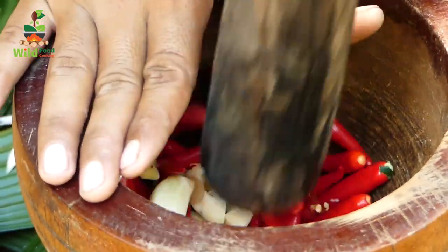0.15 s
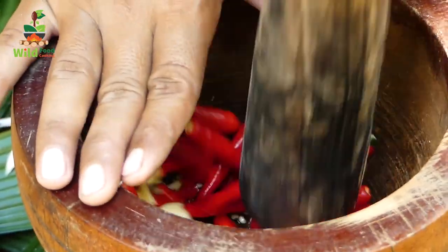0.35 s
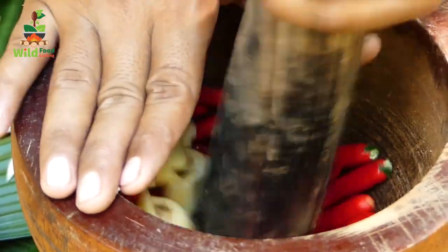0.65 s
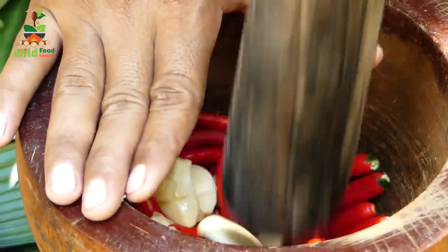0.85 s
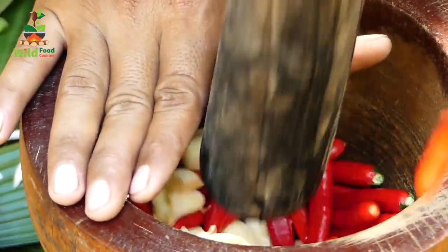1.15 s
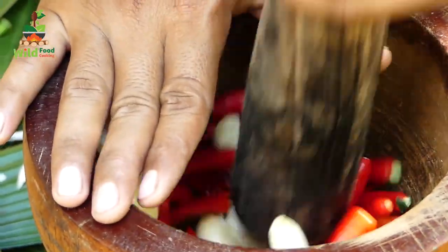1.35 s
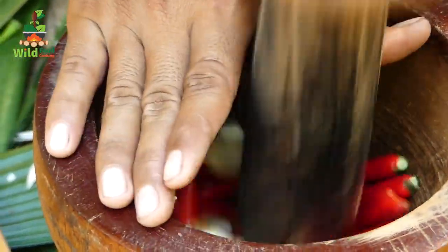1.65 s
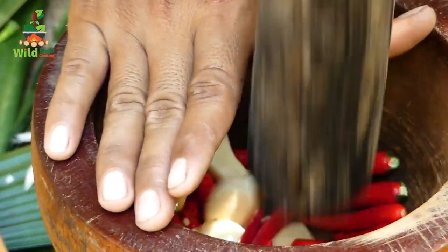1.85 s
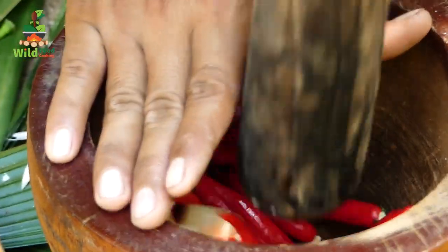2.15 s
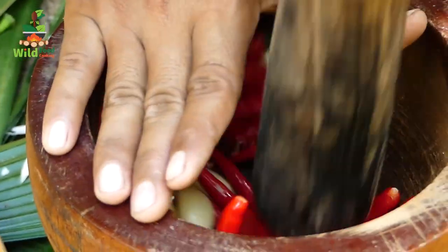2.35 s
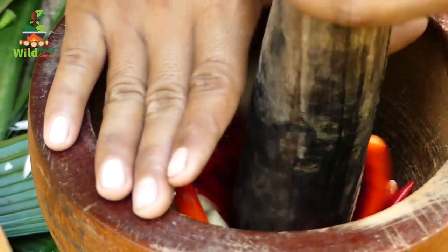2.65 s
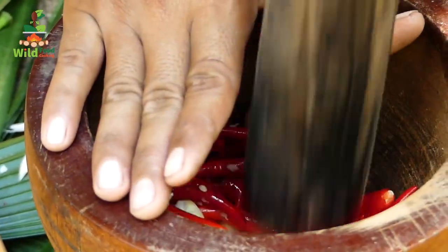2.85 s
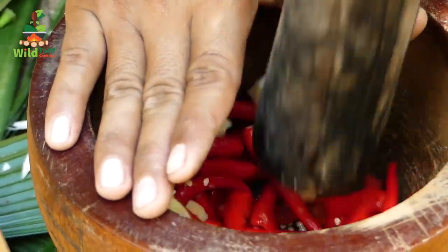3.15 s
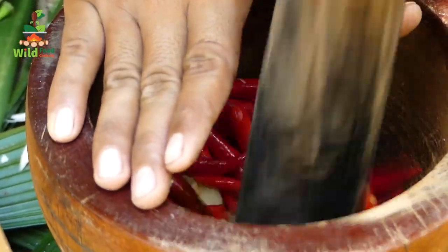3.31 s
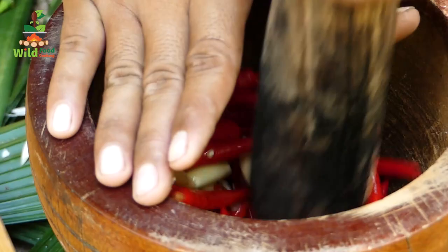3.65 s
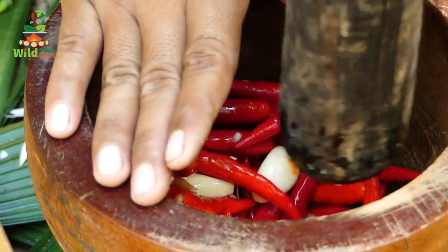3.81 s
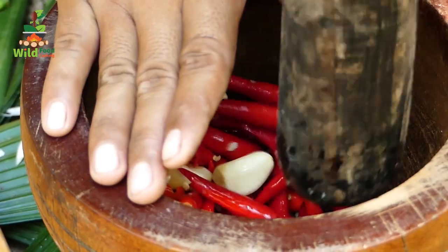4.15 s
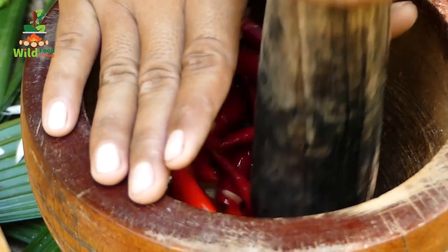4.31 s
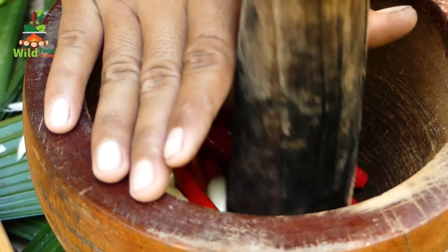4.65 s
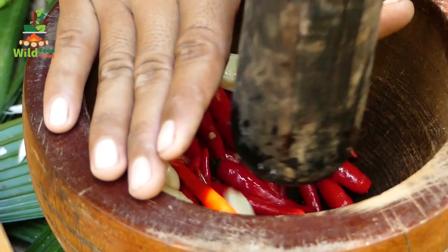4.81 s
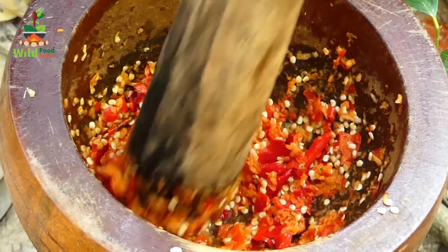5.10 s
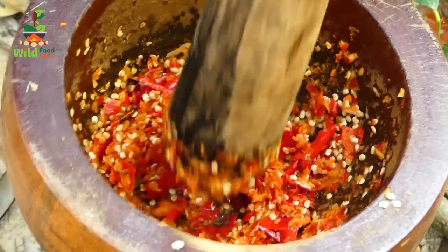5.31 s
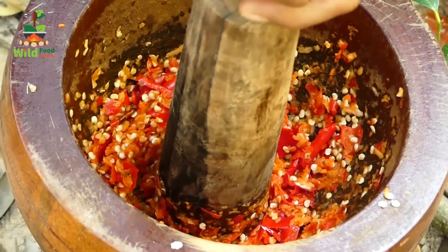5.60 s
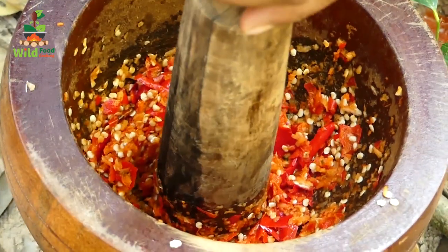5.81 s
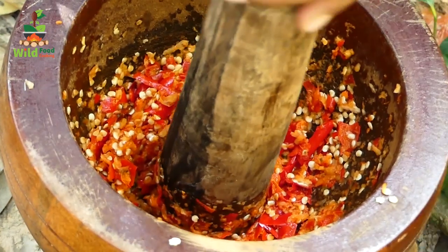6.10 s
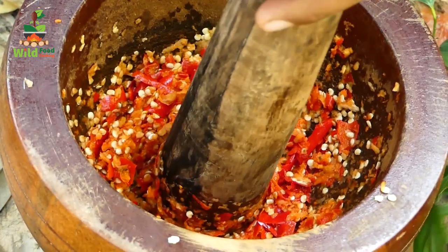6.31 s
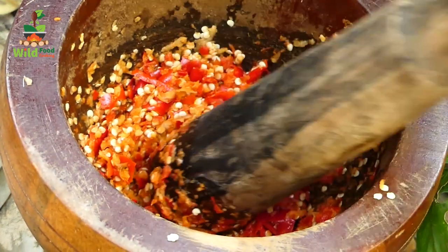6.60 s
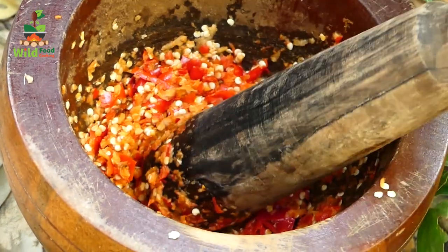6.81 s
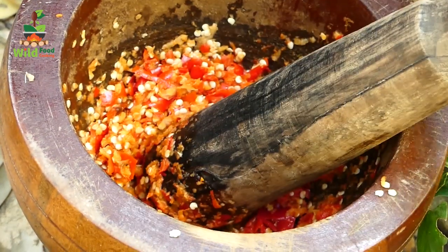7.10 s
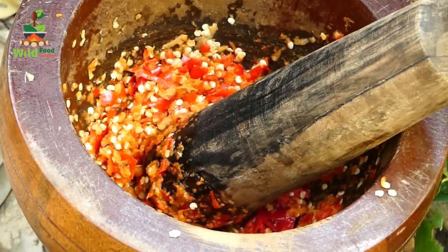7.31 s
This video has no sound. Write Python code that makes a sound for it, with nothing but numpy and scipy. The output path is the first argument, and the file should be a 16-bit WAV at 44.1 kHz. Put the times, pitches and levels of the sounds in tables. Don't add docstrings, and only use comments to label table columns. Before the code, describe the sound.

Close microphone, nearly mono, in open air: about nine pounding blows a second, high-pitched, crisp and wet, each varying in crunch, thud and ring. Then a soft touch and a few natural-speed strikes with light wind and faint insects. Everything cuts out briefly; a hard wooden strike follows, then scraping through paste with seeds popping and short, rising bird whistles.

```python
import sys
import numpy as np
from scipy import signal
from scipy.io import wavfile
from scipy.ndimage import uniform_filter1d

SR = 44100
rng = np.random.default_rng(int(sys.argv[2]) if len(sys.argv) > 2 else 0)


def transcribe(u):
    v = np.clip(np.atleast_2d(u).T, -1, 1)
    q = np.round(v * 32767).astype(np.int16)
    wavfile.write(sys.argv[1], SR, q)


def volts_from_decibels(level):
    exponent = np.asarray(level, float) / 20
    return 10 ** exponent


N = 328969
SLOW_FROM_S, FAST = 3.631, 3
GRIND_FROM_S = 5.7

# start in seconds, end in seconds.
SILENCE = (5.0915, 5.4085)

# time in seconds, crunch level in dB, thud level in dB, ring
# level in dB, time the food takes to give way in ms.
EVEN_BLOWS = [(0.0654, -26.5, -31.5, -62, 3), (0.1746, -25, -26, -58, 6), (0.2849, -31.5, -31, -30, 3),
              (0.3958, -29.5, -36.5, -25, 2.4), (0.5111, -30.5, -25.5, -50, 8.5),
              (0.6191, -26.5, -29, -32, 6.5), (0.7285, -32, -28.5, -27.5, 3), (0.8396, -26, -22, -29, 3.5),
              (0.9526, -30, -45, -23, 5), (1.0630, -19, -26.5, -36, 7), (1.1744, -22.5, -28.5, -39, 4.5),
              (1.2847, -24.5, -18, -25, 7), (1.4093, -29.5, -30.5, -28.5, 8.5), (1.521, -29, -42, -35, 7),
              (1.6288, -32, -37.5, -42, 5.3), (1.7352, -33, -31.5, -33, 3.5),
              (1.8485, -26.5, -38.5, -29, 6.5), (1.9567, -27.5, -44, -34, 3.5),
              (2.0655, -31.5, -31, -33, 2), (2.176, -31, -26.5, -58, 2), (2.286, -31.5, -41, -47, 3),
              (2.3965, -29, -35, -30.5, 1.5), (2.5068, -30.5, -25, -25, 2),
              (2.6171, -31.5, -46, -33.5, 3.5), (2.7246, -32.5, -42, -34.5, 8),
              (2.8375, -27, -32.5, -49, 7), (2.9485, -32, -23, -33, 2.5), (3.0601, -32, -36.5, -32.5, 7.5),
              (3.1748, -38, -36.5, -31.5, 5.5), (3.296, -34.5, -45, -38, 4), (3.404, -33.5, -40.5, -40, 4),
              (3.516, -27, -29, -36, 3)]
# time in seconds, crunch level in dB, thud level in dB,
# ring level in dB, time the food takes to give way in ms.
STRIKES = [
    (3.645, -43.5, -62, -64, 14),
    (3.951, -34, -31.5, -40, 1),
    (4.293, -24.5, -33, -8.5, 8.5),
    (4.6253, -27, -37, -62, 4),
    (4.951, -25.5, -32, -43, 5.5),
    (5.4899, -11, -31, -2.5, 2.8),
]
HITS = EVEN_BLOWS + STRIKES
# time in seconds, level in dB, 15 dB
# rise in ms, 15 dB fall in ms.
BURSTS = [(2.295, -35, 1.5, 3), (1.098, -46, 3, 4), (1.36, -46, 8, 8), (2.157, -45, 1, 2),
          (2.519, -40, 2, 3), (0.9915, -27, .9, .9), (3.2752, -31, .8, .8), (3.976, -39, 17, 14),
          (4.272, -49, 4, 2), (4.283, -35, 4.5, 9), (4.615, -44.5, 7, 15), (4.663, -55.5, 30, 31),
          (4.988, -54.5, 50, 26), (4.941, -41.5, 6.5, 16), (4.326, -51.5, 7.5, 2), (4.342, -47.5, 4, 14),
          (7.42, -44.5, 18, 38), (4.311, -37.5, 19, 15), (5.49, -6, 1.5, 0.5), (5.853, -47, 17, 39),
          (6.179, -26.5, 7, 11.5), (6.691, -34, 2, 16), (6.861, -50.5, 8, 5), (7.182, -51, 41, 42)]
# frequency in Hz, density in dB per Hz.
CRUNCH_FAST = [(350, -31), (600, -1), (1420, -30.5), (1750, 1.5), (3300, -10), (4120, -3), (4610, -5),
               (8720, -4.5), (14400, -7.5), (16500, -38)]
# frequency in Hz, density in dB per Hz.
CRUNCH_SLOW = [(350, -38), (600, 3), (966, -8.5), (1230, -0.5), (1660, -6), (2680, -6.5), (4260, -7.5),
               (4680, -13), (7430, -8.5), (15500, -20.5)]
# frequency in Hz, density in dB per Hz.
CRACK = [(940, -31), (1600, -10.5), (2630, -3), (3580, -10), (4270, -5.5), (6110, -24), (7280, -6),
         (9370, -22), (15400, -16.5), (16300, -28.5)]

# frequency in Hz, level in dB, 60 dB decay in seconds.
THUD = [(140, -7, .045), (225, 0, .045), (290, 3, .04)]
# frequency in Hz, level in dB, 60 dB decay in seconds.
FULL_RING = [(576, 0, .038), (775, -14, .1), (1040, -8, .02), (1365, -11, .055), (1395, -11, .055),
             (1857, -22, .04), (2450, -22, .02)]
# frequency in Hz, level in dB, 60 dB decay in seconds.
BARE_RING = [(590, -2, .028), (690, 0, .026), (1050, -2, .016), (1357, -11, .028), (2450, -5, .007),
             (4070, -10, .004), (5300, -4, .004), (7500, -10, .003)]
# time in seconds, peak level in dB.
TAPS = [(6.123, -25.5), (6.177, -26), (6.193, -24), (6.64, -28), (6.689, -20), (7.131, -35), (7.155, -34),
        (7.379, -28.5)]

# time in seconds, peak level in dB, centre frequency in Hz.
SNAPS = [(0.2204, -36.5, 7640), (0.9253, -43, 12000), (1.1268, -42, 2510), (1.3064, -35, 4460),
         (1.3603, -40, 4680), (1.3833, -37, 5560), (1.5374, -32, 5320), (1.5544, -39, 5700),
         (1.7944, -39.5, 2530), (1.8287, -36, 7870), (2.0358, -38.5, 4300), (2.0804, -33, 9190),
         (2.1186, -39, 11400), (2.6743, -42, 4430), (3.6794, -44, 2660), (3.7968, -46, 6170),
         (4.4897, -45, 4100), (4.794, -38.5, 8100), (4.8798, -46, 7350), (5.9444, -37, 1500),
         (5.9643, -45, 1320), (6.0861, -36, 7950), (6.1044, -39, 9100), (6.4512, -22, 7900),
         (6.9287, -46, 8510), (7.3392, -35, 8170), (7.3602, -22, 7960), (7.4106, -32, 12200),
         (7.4164, -30, 9910), (7.425, -24, 7240)]

HUSH_DB = (-57, -56.5, -53.5)
# frequency in Hz, density in dB per Hz.
HUSH_FAST = [(47, -36), (80, 3.5), (139, 4.5), (428, -2), (533, -8), (1410, -12.5), (1720, -17),
             (2920, -18), (5780, -21), (6450, -21.5), (11500, -24.5), (15600, -28)]
# frequency in Hz, density in dB per Hz.
HUSH_SLOW = [(24, -29), (40, -2), (66, -8.5), (108, -11), (241, -23), (387, -22), (484, -27.5), (591, -25),
             (1080, -30), (1280, -29.5), (4460, -37.5), (15500, -37)]
# frequency in Hz, density in dB per Hz.
HUSH_LATE = [(24, -32), (40, -3.5), (64, -18), (96, -16.5), (229, -21.5), (325, -19.5), (522, -27.5),
             (1410, -28.5), (3220, -36), (5440, -36), (15500, -44)]
# time in seconds, level in dB.
WIND = [(0, -45), (1.4, -45), (2.4, -48), (3.62, -48), (3.64, -46), (4.4, -37), (5.1, -43), (5.4, -38),
        (6.0, -35), (6.7, -34), (7.0, -40), (7.46, -36)]

# start in seconds, end in seconds, centre in Hz, bandwidth in Hz, level in dB.
INSECTS = [(3.66, 3.84, 6150, 200, -77), (4.547, 4.784, 8700, 900, -69), (4.8, 4.97, 6600, 1300, -65),
           (5.49, 5.64, 5300, 500, -65)]
# start in seconds, end in seconds, frequency in Hz, level in dB.
FAR_WHISTLE = (4.092, 4.275, 5762, -59.5)
# time in seconds, direct level in dB, echo level in dB.
CHIRPS = [
    (5.33, -85.5, -57.5),
    (5.884, -40, -47),
    (6.36, -44, -46.5),
    (6.891, -43, -45),
    (7.352, -36, -40),
]

# peak in seconds, peak level in dB, rise in dB per second,
# fall in dB per second.
STROKES = [
    (5.86, -59, 85, 55),
    (6.12, -48, 103, 78),
    (6.184, -44.5, 157, 263),
    (6.631, -39.5, 215, 174),
]
# frequency in Hz, density in dB per Hz.
GRIND_COLOUR = [(88, -36), (150, -4.5), (263, -2.5), (411, -2.5), (519, -5.5), (631, -4), (695, -2.5),
                (1220, -4), (2180, -7.5), (4140, -8.5), (6110, -12), (8170, -8), (15500, -18.5)]

# frequency in Hz, level in dB.
SIDE_DB = [(60, -42), (180, -23.5), (550, -15.5), (1650, -19.5), (4970, -15), (15000, -10.5)]


def evened(x):
    return x / np.sqrt(np.mean(x ** 2) + 1e-20)


def read(points, hz):
    f, value = np.transpose(points)
    return np.interp(np.log(hz + 1), np.log(f + 1), value)


def follow(rows):
    s, value = np.transpose(rows)
    return np.interp(np.arange(N) / SR, s, value)


def add(mix, s, sound):
    part = mix[round(s * SR):][:len(sound)]
    part += sound[:len(part)]


def speed(s):
    return np.where(s < SLOW_FROM_S, FAST, 1)


def colour(x, spectrum):
    log_gain = np.log(volts_from_decibels(read(spectrum, abs(np.fft.fftfreq(4096, 1 / SR)))))
    response = np.exp(np.conj(signal.hilbert(log_gain)))
    taps = np.fft.ifft(response).real[:2048]
    return signal.oaconvolve(x, taps / np.linalg.norm(taps))[:len(x)]


def band(x, hz, width):
    return signal.lfilter(*signal.iirpeak(hz, hz / width, SR), x)


def drift(samples):
    once = uniform_filter1d(rng.standard_normal(N), int(samples))
    return evened(uniform_filter1d(once, int(samples)))


def crackle(spread_db, grain):
    return evened(rng.standard_normal(N) * volts_from_decibels(spread_db * drift(grain)))


def modes(table, factor, detune, contact_ms, low_hz):
    t = np.arange(6000) / SR * factor
    ring = np.zeros(len(t))
    for (hz, db, t60), shift in zip(table, detune):
        ring += volts_from_decibels(db - 60 * t / t60) * np.sin(2 * np.pi * hz * shift * t)
    ring = np.convolve(ring, np.hanning(3 + int(contact_ms * SR / 1000 / factor)))
    ring = signal.sosfilt(signal.butter(2, low_hz * factor, "high", fs=SR, output="sos"), ring)
    return ring / abs(ring).max() * np.sqrt(2)


def give_ms(s, db, rise_ms):
    hard_db, hard_fall_ms, soft_ms_per_db, shorter_per_ms = -22, 5, .6, .55
    stretch = 1 if speed(s) > 1 else 2.2
    fall_ms = hard_fall_ms + soft_ms_per_db * (hard_db - db) - shorter_per_ms * rise_ms / stretch
    return rise_ms, stretch * max(fall_ms, 1.0)


def crushing():
    t, level, cracks = np.arange(N) / SR, np.zeros(N), np.zeros(N)
    blows = [(s, db, *give_ms(s, db, ms)) for s, db, *_, ms in HITS]
    chance = rng.uniform(-1.6, 1, (len(HITS), 2))
    lifts = [(row[0] + 0.049 + 0.017 * a, -57 + 5 * b, 14, 18)
             for row, (a, b) in zip(HITS, chance) if speed(row[0]) > 1]
    for s, db, rise_ms, fall_ms in blows + BURSTS + lifts:
        near = slice(max(round((s - .06) * SR), 0), round((s + .25) * SR))
        ms = (t[near] - s) * 1000
        drop = np.where(ms < 0, abs(ms / rise_ms) ** 2.3, abs(ms / fall_ms) ** 1.2)
        burst = volts_from_decibels(db - 15 * drop)
        settle = volts_from_decibels(min(db, -17) - 31.5 - .5 * ms * speed(s)) * (ms > 0)
        level[near] = np.hypot(level[near], np.hypot(burst, settle))
        cracks[round(s * SR)] = -volts_from_decibels(db + 19 - .6 * (rise_ms + fall_ms))
    drive = crackle(spread_db=2.5, grain=12) * level + cracks
    fast, bare = speed(t - .06) > 1, abs(t - HITS[-1][0]) < .2
    coloured = [colour(drive, spectrum) for spectrum in (CRUNCH_FAST, CRACK, CRUNCH_SLOW)]
    return volts_from_decibels(-1.5) * np.select([fast, bare, t > 0], coloured)


def wood():
    out, rolling = np.zeros(N), np.full(N, volts_from_decibels(-56.5))
    chance = rng.uniform(-0.55, 1, (len(HITS) + len(TAPS), 12))
    for (s, _, thud_db, ring_db, *_), c in zip(HITS, chance):
        factor = speed(s)
        thud = modes(THUD, factor, 1 + .12 * c, contact_ms=2.6, low_hz=100)
        add(out, s + .001, volts_from_decibels(thud_db) * thud)
        ring, early = (FULL_RING, 0.002353 / factor) if s < SILENCE[0] else (BARE_RING, .0004)
        detune = 1 + 0.026 * (factor - 1) * c[4:]
        add(out, s - early, volts_from_decibels(ring_db) * modes(ring, factor, detune, contact_ms=.2, low_hz=300))
        add(rolling, s - early, volts_from_decibels(0.37 * ring_db - 28 - 80 * factor * np.arange(8000) / SR))
    for (s, db), c in zip(TAPS, chance[len(HITS):]):
        add(out, s, volts_from_decibels(db - 9) * modes(BARE_RING, 0.836, 1 + 0.1 * c, contact_ms=0.22, low_hz=300))
    rub = rng.standard_normal(N) * rolling * volts_from_decibels(3.5 * drift(250))
    hum_modes = ((582, 0), (1375, -8), (2450, -19))  # Hz, dB
    hums = [sum(volts_from_decibels(db) * band(rub, hz * k, 40 * k) for hz, db in hum_modes) for k in (FAST, 1)]
    return out + np.where(speed(np.arange(N) / SR) > 1, *hums)


def snaps():
    out, t = np.zeros(N), np.arange(120) / SR
    when, size, pitch = rng.random((3, 24))
    low_hz, high_hz = 3000, 9000
    faint_db = -55 + 8 * (2 * size - 1)
    faint_hz = low_hz * (high_hz / low_hz) ** pitch
    every = SNAPS + list(zip(when * SLOW_FROM_S, faint_db, faint_hz))
    for (s, db, hz), noise in zip(every, rng.standard_normal((len(every), 120))):
        click = band(noise * np.exp(-t / 0.00029), hz, .5 * hz)
        add(out, s, volts_from_decibels(db + 0.5) * click / abs(click).max())
    return out


def air():
    t = np.arange(N) / SR
    fast = speed(t) > 1
    rustle = crackle(spread_db=1.0, grain=30) * volts_from_decibels(1.0 * drift(500))
    spectra = (HUSH_FAST, HUSH_SLOW, HUSH_LATE)
    hushes = [volts_from_decibels(db) * colour(rustle, spectrum) for db, spectrum in zip(HUSH_DB, spectra)]
    hush = np.select([fast, t < SILENCE[0], t > 0], hushes)
    noise, gusts = rng.standard_normal(N), []
    for k in (FAST, 1):
        low = signal.butter(3, 17 * k, fs=SR, output="sos")
        gusts.append(evened(signal.sosfilt(low, band(noise, 13 * k, 14 * k))))
    return hush + np.where(fast, *gusts) * volts_from_decibels(follow(WIND))


def insects():
    out = np.zeros(N)
    for start, end, hz, width, db in INSECTS:
        noise = rng.standard_normal(round((end - start) * SR))
        buzz = band(band(noise, hz, width), hz, width)
        add(out, start, volts_from_decibels(db) * evened(buzz) * signal.windows.tukey(len(buzz), .3))
    return out


def bird():
    out = np.zeros(N)
    t = np.arange(round(0.028 * SR)) / SR
    glide_hz = 5770 - 540 * np.exp(-t / .005)
    whistle = np.sin(2 * np.pi * np.cumsum(glide_hz) / SR) * np.hanning(len(t))
    late = np.arange(round(.4 * SR)) / SR
    for (s, direct_db, echo_db), noise in zip(CHIRPS, rng.standard_normal((len(CHIRPS), len(late)))):
        echoes = band(np.convolve(whistle, noise * volts_from_decibels(-60 * late / .6)), 5680, 177)
        add(out, s, volts_from_decibels(direct_db + 8.5) * whistle)
        add(out, s + 0.0084, volts_from_decibels(echo_db + 3) * echoes / np.linalg.norm(whistle))
    start, end, hz, db = FAR_WHISTLE
    t = np.arange(start, end, 1 / SR)
    flutter = 1 + .45 * evened(band(rng.standard_normal(len(t)), 60, 90))
    fade = volts_from_decibels(db - 20 * (t - start)) * signal.windows.tukey(len(t), .2)
    add(out, start, flutter * fade * np.sin(2 * np.pi * hz * t))
    return out


def pressure():
    t = np.arange(N) / SR
    strokes = sum(volts_from_decibels(db - np.where(t < s, rise, fall) * abs(t - s)) for s, db, rise, fall in STROKES)
    rest = volts_from_decibels(-71.5)
    return (strokes + rest) * (t > GRIND_FROM_S)


def grinding():
    out, jerks = np.zeros(N), volts_from_decibels(1.2 * drift(150))
    layers = ((900, "low", 60), ([900, 2500], "band", 40), ([2500, 6000], "band", 24), (6000, "high", 14))
    for hz, kind, grain in layers:
        grit = crackle(spread_db=3.4, grain=grain) * volts_from_decibels(2.0 * drift(300)) * jerks
        out += signal.sosfilt(signal.butter(2, hz, kind, fs=SR, output="sos"), grit)
    return colour(out * pressure() * volts_from_decibels(4), GRIND_COLOUR)


def scene():
    t, crush = np.arange(N) / SR, crushing()
    fast = speed(t) > 1
    mix = crush * ~fast + wood() + snaps() + air() + insects() + bird() + grinding()
    mix = signal.sosfilt(signal.ellip(10, .5, 70, 15900, fs=SR, output="sos"), mix) + crush * fast
    heard = (t < SILENCE[0]) | (t > SILENCE[1])
    return np.tile(mix * heard, (2, 1))


def band_limit(x):
    return signal.sosfilt(signal.butter(12, 16830, fs=SR, output="sos"), x)


def record(dry):
    hz, _, z = signal.stft(dry[0], SR, nperseg=256)
    size = np.minimum(abs(z), volts_from_decibels(-65)) * volts_from_decibels(read(SIDE_DB, hz))[:, None]
    scrambled = size * np.exp(2j * np.pi * rng.random(z.shape))
    side = signal.istft(scrambled, SR, nperseg=256)[1][:N]
    return band_limit(np.clip(dry + np.outer([1, -1], side), -1, 1))


dry = scene()
out = record(dry)
transcribe(out)
```